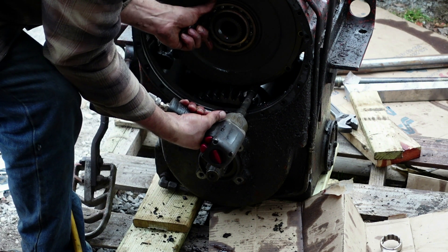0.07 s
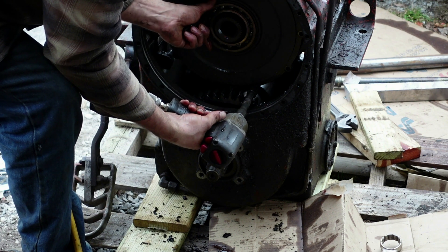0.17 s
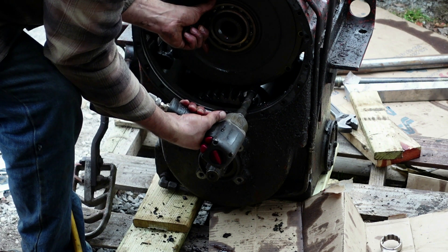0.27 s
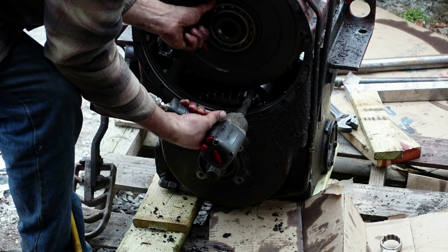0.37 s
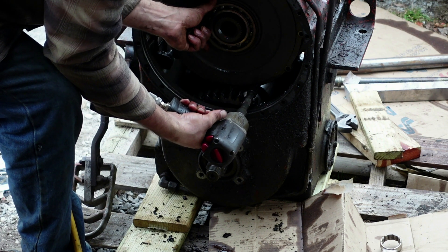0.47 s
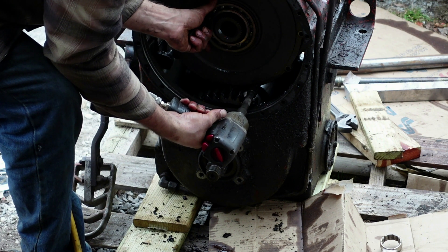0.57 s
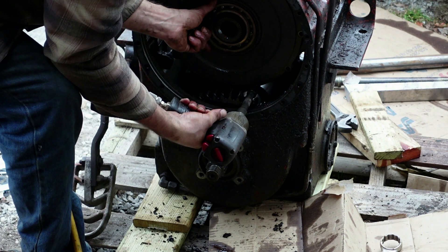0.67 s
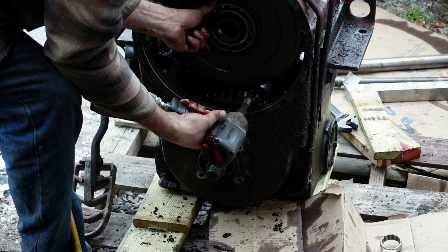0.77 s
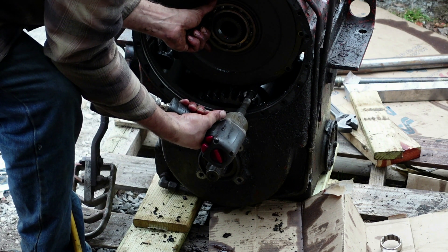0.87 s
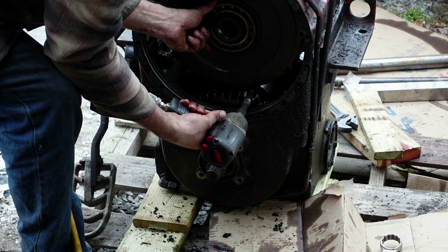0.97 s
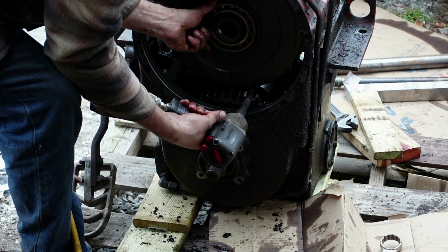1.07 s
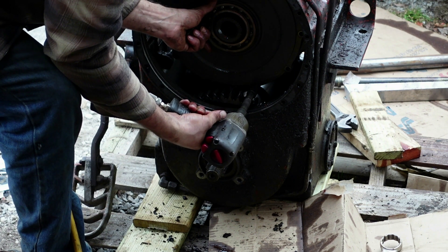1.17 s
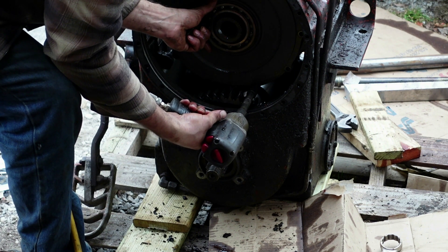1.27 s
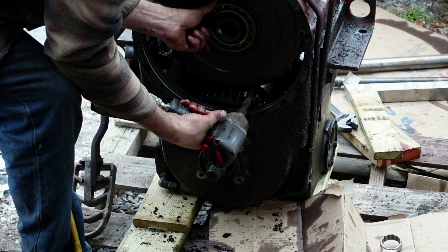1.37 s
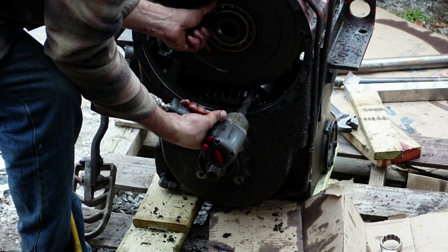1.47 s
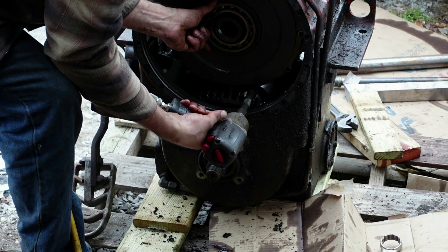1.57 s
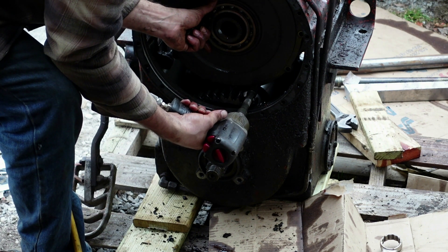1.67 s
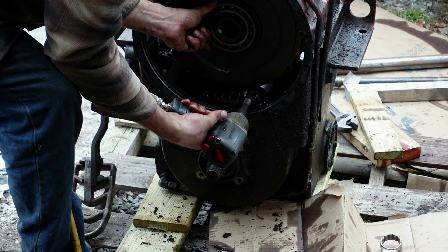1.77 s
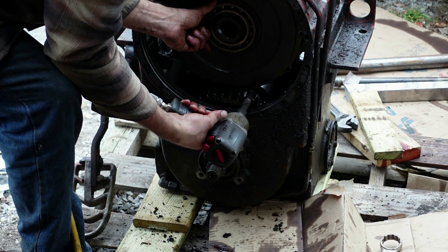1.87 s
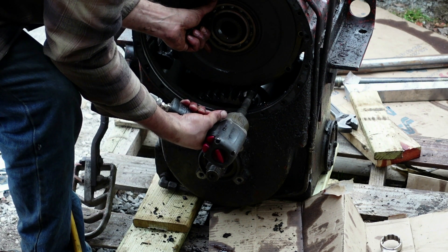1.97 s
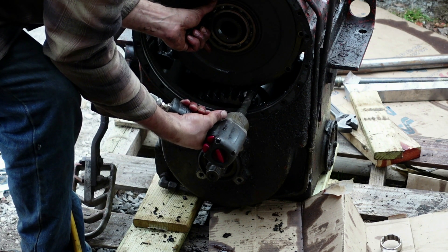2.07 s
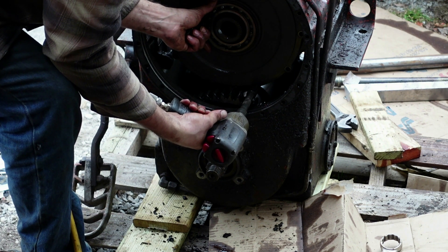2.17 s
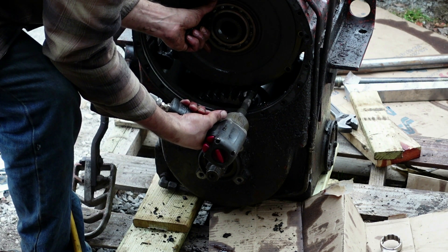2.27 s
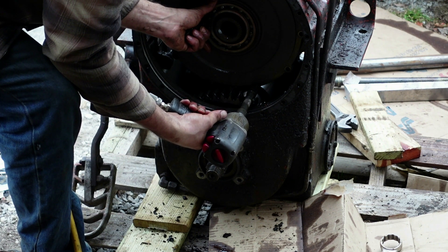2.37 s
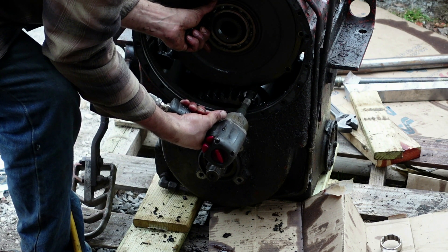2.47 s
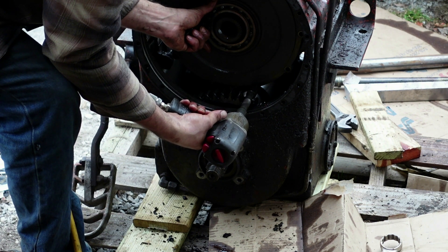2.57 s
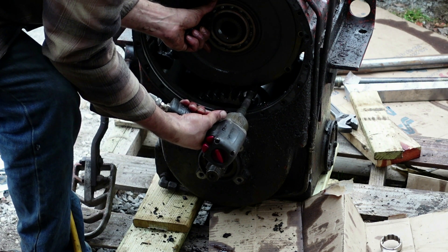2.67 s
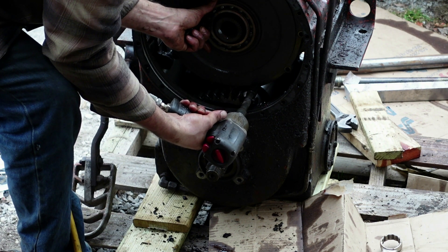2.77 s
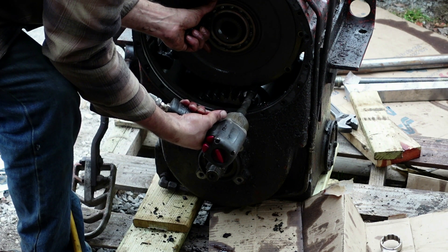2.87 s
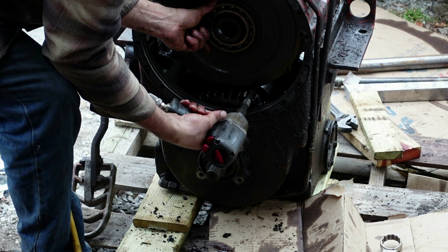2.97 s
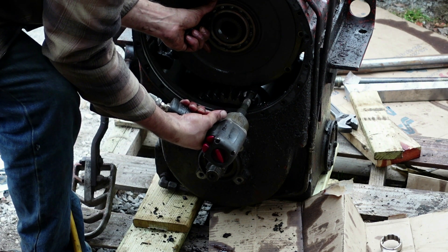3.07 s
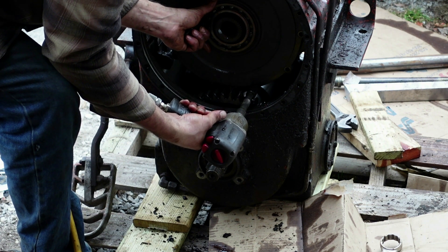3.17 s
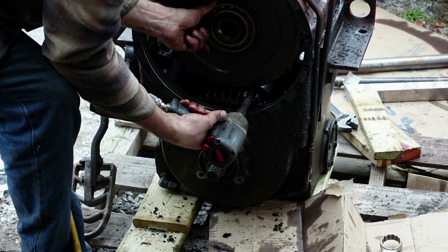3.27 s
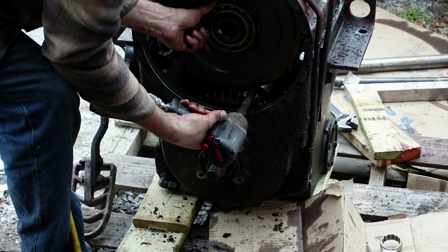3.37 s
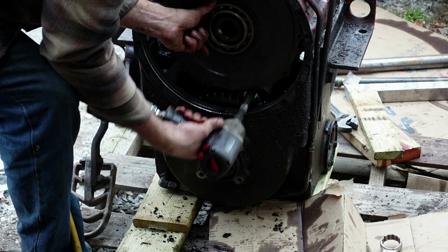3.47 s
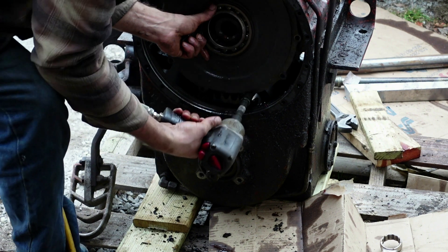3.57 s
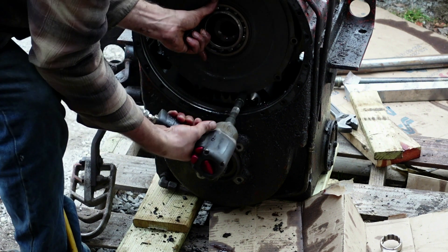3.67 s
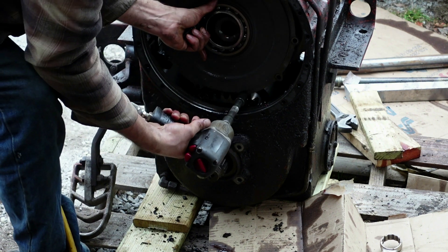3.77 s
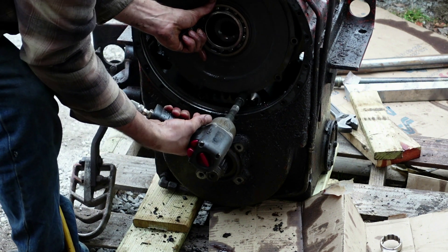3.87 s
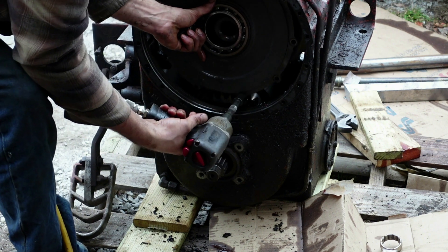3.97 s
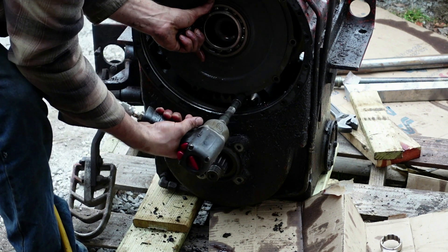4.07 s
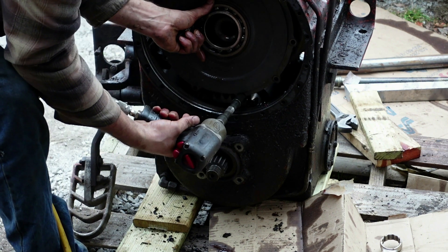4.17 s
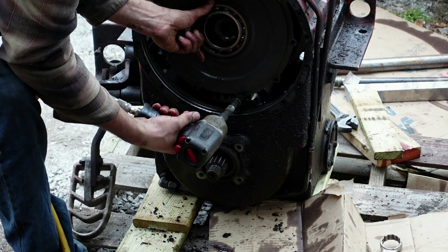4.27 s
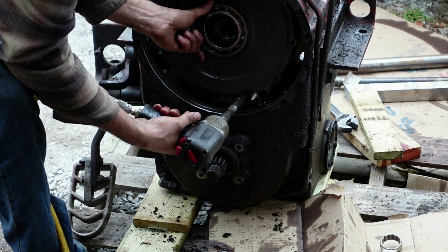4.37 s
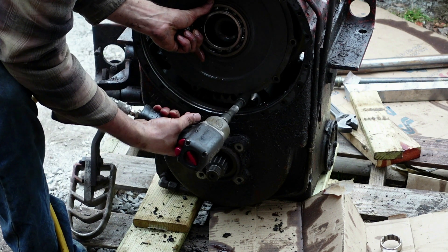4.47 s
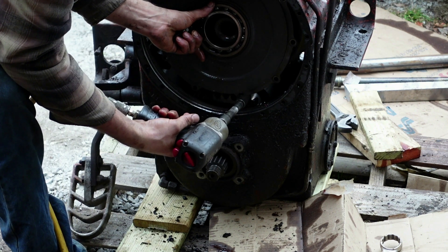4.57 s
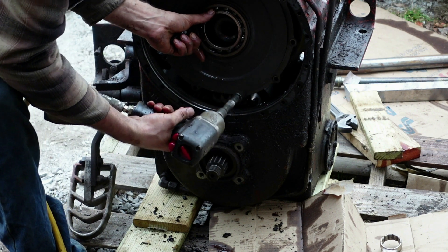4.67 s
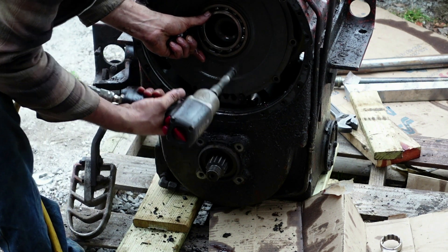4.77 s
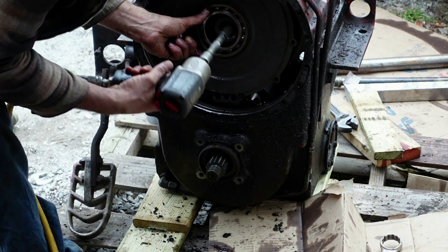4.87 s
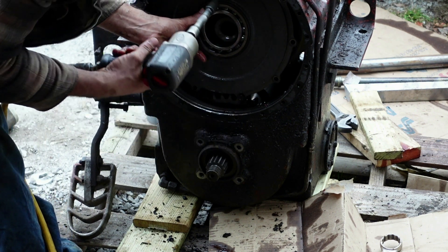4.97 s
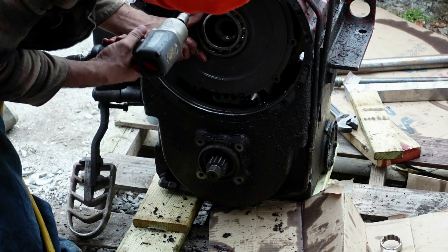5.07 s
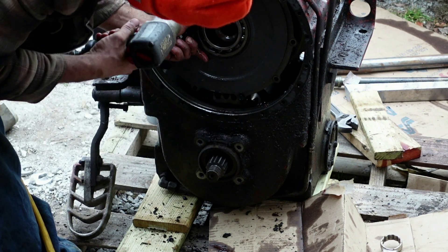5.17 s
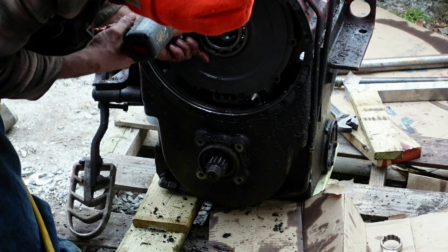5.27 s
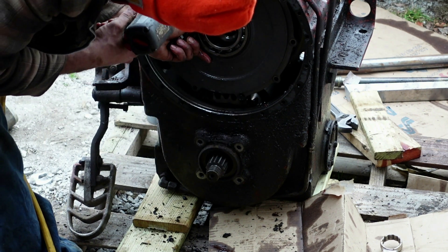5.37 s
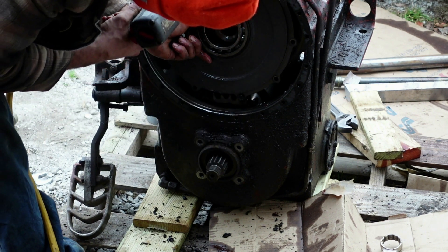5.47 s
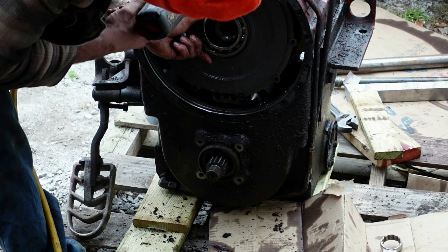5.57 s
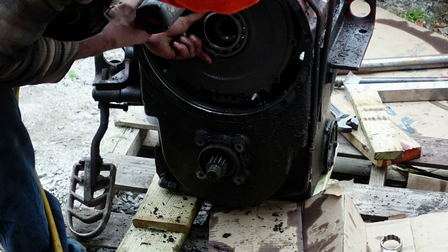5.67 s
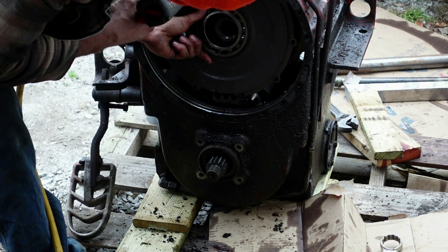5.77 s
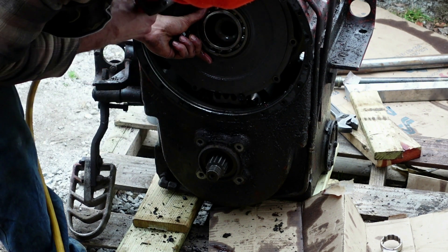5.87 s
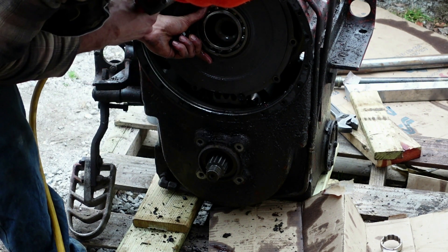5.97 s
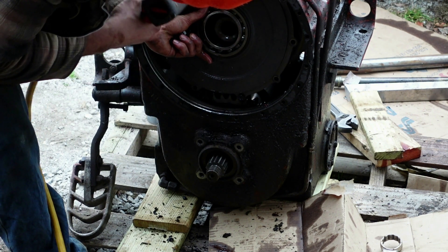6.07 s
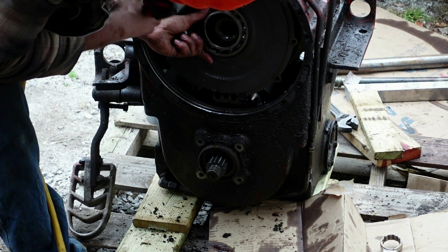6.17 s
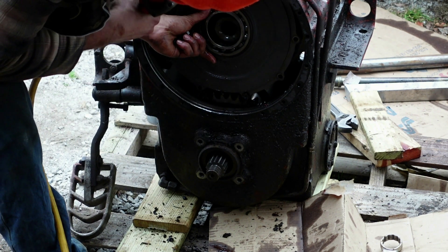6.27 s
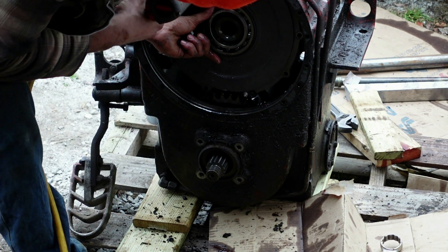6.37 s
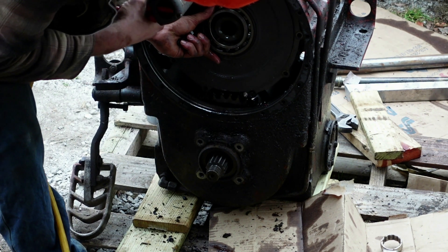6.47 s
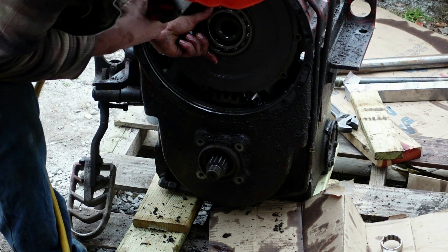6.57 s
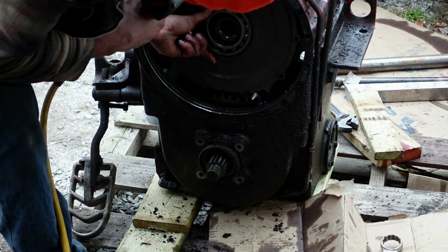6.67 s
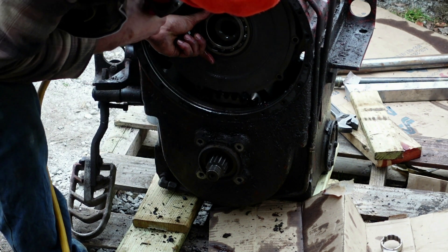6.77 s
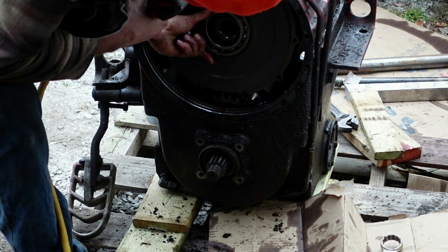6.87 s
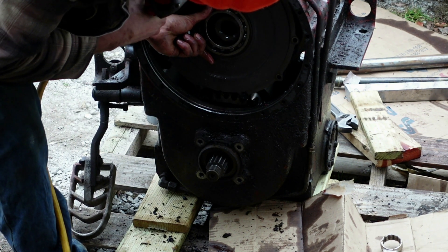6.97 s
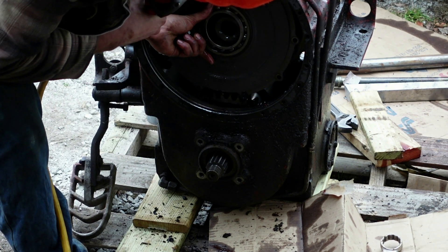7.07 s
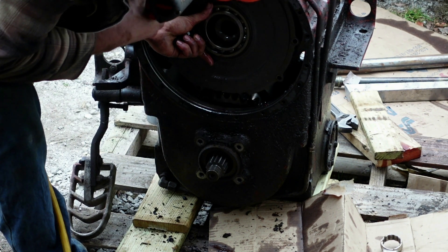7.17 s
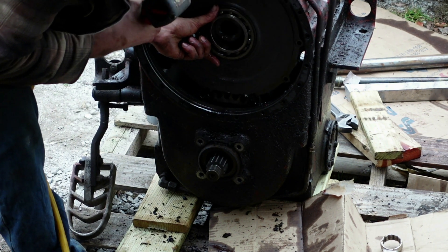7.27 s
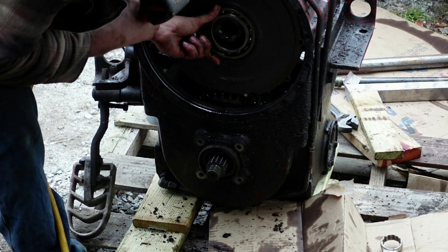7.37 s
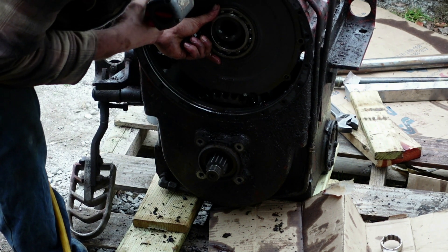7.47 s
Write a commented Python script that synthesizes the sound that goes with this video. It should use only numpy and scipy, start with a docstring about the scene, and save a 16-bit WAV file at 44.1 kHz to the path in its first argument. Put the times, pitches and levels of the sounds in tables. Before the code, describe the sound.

Close, nearly central sound in a workshop with short, bright wall reflections. From 0 to 3.53 s an air impact wrench hammers at nearly six strokes a second, slightly uneven: two light rattling blows, then a hard slam ringing steel and iron, sometimes a softer rebound. Between blows the motor gulps air, barks, buzzes upward and is braked, with pulsing exhaust hiss. At 3.54 s the bolt gives, the rotor surges and slows, exhaust dies from 3.7 s, and a short squeak and dull knock come around 3.8 s. Faint scrapes and singing socket touches last to 4.35 s, then near silence over a quiet steady background. A click at 5.7 s opens soft rustling and irregular clinks, clanks and knocks, strongest at 6.3 and 6.78 s. Air whistles faintly from 6.95 s; at 7.17 s the motor whirls up freely, peaks near 7.3 s and drops in pitch, fading by about 7.55 s.

```python
"""An air impact wrench hammers a bolt out of a heavy iron housing, about six rattling strokes a second.
The bolt comes free, the motor coasts down and squeaks; then socket and housing click and knock
as the tool is set on the next bolt. Air whistles through the half-open trigger and the motor whirls up freely.
Blows are short bursts of noise through ringing metal, and the motor is a buzz with pulsing hiss.
Cloth and hose rustle, a quiet background lies underneath, and hard workshop walls answer."""
import sys
import numpy as np
from scipy import signal
from scipy.fft import rfft, irfft, next_fast_len
from scipy.io import wavfile
from scipy.ndimage import uniform_filter1d, map_coordinates

SR = 44100
rng = np.random.default_rng(int(sys.argv[2]) if len(sys.argv) > 2 else 0)


def inscribe(sig):
    """Save sig as 16-bit PCM at rate SR to the path in sys.argv[1].

    A 1-D sig is mono; a 2-D sig holds one channel per row.
    Samples are clipped to [-1, 1] before scaling.
    """
    pcm = np.round(np.clip(np.atleast_2d(sig).T, -1, 1) * 32767)
    wavfile.write(sys.argv[1], SR, pcm.astype(np.int16))


N = 332514  # length in samples

# Levels in the tables are starting points: each layer may still be trimmed or varied where it is made.

# Hammer strokes, two light blows and a slam. Each row: first blow in seconds, slam in seconds,
# light blows in dB, slam in dB, muffler bark in dB, rotor howl in dB, lean from cover ring to housing boom in dB.
STROKES = [(.001, 0.063, -13, -12.5, -37, -31, -0.5), (.149, 0.2184, -12.5, -14, -30.5, -35, 1.5),
           (0.336, 0.4185, -14, -11, -35.5, -38.5, -4), (0.523, 0.5895, -11.5, -12, -32.5, -34, 0),
           (.705, .7781, -11, -13.5, -17.5, -28.5, -5), (.868, .9348, -11, -13, -35, -28.5, -2),
           (1.039, 1.0974, -12, -14, -40, -27, 0), (1.197, 1.262, -11, -11, -35.5, -32, -1),
           (1.372, 1.4388, -15, -13.5, -29, -31.5, -6.5), (1.535, 1.6054, -10, -11, -26.5, -29.5, 1),
           (1.696, 1.7683, -11, -13, -22.5, -27, 5.5), (1.8785, 1.946, -12, -13.5, -22.5, -29, -4),
           (2.0575, 2.1233, -11.5, -12.5, -33.5, -31, 5.5), (2.2334, 2.2947, -9.5, -13, -28, -31, 0),
           (2.401, 2.4702, -11.5, -12.5, -17, -29.5, 9), (2.594, 2.6553, -10.5, -13, -23.5, -29, 4),
           (2.768, 2.829, -11.5, -12, -28.5, -29, 5.5), (2.945, 3.0046, -12, -13, -29.5, -29.5, 1),
           (3.114, 3.1719, -10.5, -11, -27.5, -27, 10), (3.290, 3.3494, -10, -13, -40.5, -28, 6),
           (3.466, 3.5302, -12.5, -11, -30, -28.5, 4)]
# The hammer rebounds between strokes. Each row: time in seconds, level in dB.
REBOUNDS = [(0.1144, -13), (0.8395, -7.5), (1.0066, -12.5), (1.1608, -11.5), (1.6721, -9.5), (2.0193, -13),
            (2.2004, -12.5), (2.3725, -11.5), (2.7327, -11), (2.9128, -12), (3.0824, -10), (3.25, -13),
            (3.4336, -12.5)]
# Colour of hammer on anvil. Each row: frequency in Hz, relative level in dB per Hz.
CLACK = [(760, -30), (1300, -1), (1370, 0.5), (1470, -1.5), (1600, 0), (2340, -8), (2740, -4), (3600, -7),
         (4830, -7.5), (7920, -7), (9970, -13.5), (14300, -16.5), (16000, -21)]
# Ringing of socket and anvil. Each row: frequency in Hz, width in Hz, relative level in dB.
STEEL = [(1970, 25, -21), (2320, 30, 6), (2636, 26, -4.5), (2850, 48, 6.5), (3546, 20, -17), (4213, 48, 6),
         (4838, 83, -3.5), (6226, 55, 4), (8133, 90, -10.5), (8800, 14, -6.5)]
# Ringing of the housing. Each row: frequency in Hz, width in Hz, relative level in dB.
IRON = [(342, 20, -4.5), (483, 120, -13.5), (570, 28, -7), (1030, 19, -6.5), (1126, 27, 1), (1388, 47, 4),
        (1574, 43, -4.5), (1840, 46, -7)]
# Housing boom under the slam. Each row: frequency in Hz, relative level in dB, time to fall 60 dB in seconds.
BOOM = [(586, -3.5, 0.089), (609.2, -8, 0.15), (535, -4, 0.058)]
# Cover ring under the slam. Each row: frequency in Hz, relative level in dB, time to fall 60 dB in seconds.
RING = [(1151, 4, 0.18), (850, -16, 0.32), (1343, -11, 0.34), (1586, -8.5, 0.19)]

# Course of the rotor through a stroke. Each row: seconds after the kick, vanes passing in Hz, swell in dB.
STROKE = [(0, 328, -13.5), (.02, 540, -3), (0.039, 562.6, -1.5), (.06, 479.5, 1.5), (.075, 417.7, 0),
          (0.091, 338.4, -11.5), (.13, 288.7, -17.5), (.2, 249, -17.5)]
# Colour of the gulp of air. Each row: frequency in Hz, relative level in dB per Hz.
THUMP = [(30, -38.5), (60, -23), (100, -10.5), (150, 0.5), (320, 1), (500, -5.5), (1000, -31.5),
         (3000, -72)]
# Bark of the muffler. Each row: frequency in Hz, relative level in dB, time to fall 60 dB in seconds.
BARK = [(1042, 6, 0.029), (940, -6, 0.063), (1346, -16, 0.23)]
# Colour of the muffler's howl under load. Each row: frequency in Hz, relative level in dB per Hz.
HOWL = [(200, -32.5), (480, -8.5), (720, -6), (900, 4.5), (1050, 3), (1250, -5), (2000, -17), (4000, -36),
        (12000, -40.5)]
# Colour of the air in the motor. Each row: frequency in Hz, relative level in dB per Hz.
CHURN = [(40, -47), (100, -23.5), (220, -3), (350, -0.5), (560, 1), (760, -6), (1100, -2), (2000, -16),
         (5000, -38.5)]
# Colour of the exhaust air under load. Each row: frequency in Hz, relative level in dB per Hz.
EXHAUST = [(71, -59.5), (120, -29), (295, -2.5), (385, -8.5), (524, -1.5), (670, -3.5), (1370, -1),
           (1550, 0), (2750, -3), (3820, -4.5), (10200, -10.5), (13600, -17), (16000, -18)]

# Squeak as the rotor stops. Each row: frequency in Hz, relative level in dB, time to fall 60 dB in seconds.
SQUEAK = [(760, 1.5, .08), (930, -9, .07)]
# Speed of the free run. Each row: time in seconds, vanes passing in Hz.
SPIN = [(7.11, 264.2), (7.159, 245.1), (7.235, 353.9), (7.265, 478.3), (7.293, 541.9), (7.35, 439),
        (7.41, 350.3), (7.465, 289), (7.54, 236.6)]
# Colour of the motor case's hum. Each row: frequency in Hz, relative level in dB per Hz.
HUM = [(50, -36), (150, -12.5), (260, -1.5), (350, 2), (500, -2), (750, -5.5), (1200, -15), (3000, -44.5)]
# Resonances of the muffler. Each row: frequency in Hz, width in Hz, relative level in dB.
MUFFLER = [(900, 77, -4), (1054, 130, 5.5), (1166, 64, 2.5), (1390, 33, -3), (1580, 100, -19)]
# Colour of the air in the free run. Each row: frequency in Hz, relative level in dB per Hz.
BLAST = [(100, -50.5), (760, -33.5), (1300, -10.5), (1380, -5.5), (2110, -5), (2290, -9.5), (2830, -4.5),
         (3720, -10.5), (4540, -6.5), (5480, -9.5), (12700, -15.5), (16000, -21)]

# Air leaks through the trigger valve. Each row: start in seconds, end in seconds, rise in seconds, level in dB.
LEAKS = [(6.948, 7.16, 0.11, -38), (7.155, 7.2, .02, -26)]
# Tones of the trigger valve. Each row: frequency in Hz, width in Hz, relative level in dB.
VALVE = [(1056, 110, 5), (2766, 180, -4), (3550, 300, -14), (6100, 330, 3.5), (6800, 200, -9),
         (8600, 300, -9.5), (9300, 250, 2.5), (9800, 300, -5.5), (11290, 150, 0.5), (15600, 500, -7.5)]
# The rotor runs light and the slots hiss. Each row: start in seconds, end in seconds, level in dB.
RACES = [(.215, .43, -32.5), (3.535, 3.62, -25)]
# Tones of the exhaust slots. Each row: frequency in Hz, width in Hz, relative level in dB.
PORTS = [(7700, 300, 1), (8850, 450, -3), (9700, 400, -1), (10760, 250, -3.5), (13000, 340, -6)]

# Socket and tool meet the iron, sharply or sliding. Each row: time in seconds, click in dB,
# clank in dB against the click, thud in dB against the click, rise in seconds.
CONTACTS = [(3.758, -28, 1.5, 3.5, .01), (3.824, -37, -4.5, 0, .0008), (4.0098, -52.5, 2.5, -3, .0008),
            (4.036, -45.5, 1.5, -3, .01), (4.06, -43.5, 1, -4.5, .01), (4.114, -45, 2, -3, .01),
            (4.3142, -61.5, 6, -10, .0008), (4.3423, -64.5, 10.5, 1, 0.00077),
            (5.7131, -27, -7, -19, .0008), (5.876, -52.5, 6, 21, .01), (5.938, -36.5, 3, 3, .01),
            (5.956, -37, -2, 7, .01), (6.1015, -38.5, -18, -11.5, .0008), (6.12, -49.5, 4.5, 7.5, .01),
            (6.192, -43.5, -4.5, 0.5, .01), (6.2477, -35.5, -4.5, -2.5, .0008),
            (6.2806, -30.5, 11.5, 7, .002), (6.29, -34, 11, 12.5, .01), (6.3577, -24.5, -7.5, -4.5, .0008),
            (6.418, -31, -7.5, -19, .0008), (6.4742, -41, 6, 5.5, .0008), (6.4865, -33, -5, -6.5, .0008),
            (6.5285, -37, -5, -15, .0008), (6.6573, -47, 2, -11, .0008), (6.736, -49, 5.5, -7, .0008),
            (6.756, -32.5, -1.5, -9.5, .01), (6.7832, -17.5, -4.5, -6, .0015)]
# Colour of a hard contact. Each row: frequency in Hz, relative level in dB per Hz.
CLICK = [(1500, -21), (3000, -1), (4800, 2.5), (6300, -1.5), (8200, -2), (9500, -7), (12000, -12.5),
         (16000, -23)]
# Colour of the tool body. Each row: frequency in Hz, relative level in dB per Hz.
CLANK = [(100, -47), (700, -23.5), (1300, -3.5), (1750, 4.5), (2300, -8), (2850, -3), (3600, -6),
         (5500, -18.5), (12000, -42)]
# Colour of a dull contact. Each row: frequency in Hz, relative level in dB per Hz.
KNOCK = [(30, -67), (70, -46.5), (130, -27.5), (350, -6), (600, -3), (900, 1), (1250, -0.5), (1700, -10),
         (3000, -36.5)]
# Ringing of the wrench case. Each row: frequency in Hz, width in Hz, relative level in dB.
CASE = [(920, 45, 4), (1125, 50, -3.5), (1530, 78, -4), (1780, 44, 4.5), (2450, 62, -13), (2900, 140, 0.5),
        (3530, 82, -8.5)]
# The loose socket sings when brushed. Each row: time in seconds, level in dB, frequency in Hz.
SINGS = [(4.04, -53, 4750), (4.066, -45.5, 4838), (4.112, -50, 8850), (6.488, -46, 8133),
         (6.529, -53, 8900)]
# Sleeves and hose move. Each row: start in seconds, end in seconds, level in dB.
RUSTLES = [(3.75, 4.1, -57.5), (5.677, 7.0, -58.5), (6.199, 6.42, -51)]
# Colour of the rustling. Each row: frequency in Hz, relative level in dB per Hz.
CLOTH = [(30, -48), (100, -30), (160, -14), (400, 4.5), (1000, 1), (1700, 3.5), (2500, -6), (4500, -13),
         (9000, -16.5), (16000, -22)]

# Colour of the background. Each row: frequency in Hz, relative level in dB per Hz.
AMBIENCE = [(18, -68.5), (30, -38.5), (75, -16), (215, -17.5), (303, -7), (374, -19), (404, -7), (632, -11),
            (780, -3.5), (889, -12), (1250, -6.5), (2290, -18), (16000, -30.5)]
# How long the walls ring on. Each row: frequency in Hz, time to fall 60 dB in seconds.
WALLS = [(150, 0.22), (1000, 0.3), (5000, 0.38), (15000, 0.26)]
# Stereo width of the reflections. Each row: frequency in Hz, gain of the side signal in dB.
WIDTH = [(40, -15.5), (130, -26.5), (400, -20.5), (1000, -9.5), (2500, -5), (12000, -4)]

SECOND_BLOW_SHARE, SECOND_BLOW_DB = .275, 0.06  # how far on from first blow to slam; level against the first
FIRST_RISE_S, SECOND_RISE_S = .002, .001  # the first blow of a stroke bites more slowly
REBOUND_RISE_S = .002  # rebounds are softer than the slam
BODY_DB = -15.5  # push of a blow on the housing, against the blow's listed level
SNAP_DB = -3  # instant of steel meeting steel, against the listed slam
BOOM_DB, RING_DB = -16, -27.5  # housing and cover under the slam, before the lean
RING_SPREAD = .022  # typical random share by which each struck mode is detuned
KICK_LEAD_S = .004  # the gulp of air comes before the first blow
THUMP_DB, THUMP_PER_BARK = -29, .4  # average gulp, and how much it grows with the bark (dB per dB)
HISS_DB, LOAD_WHISTLE_DB = -32.5, -39  # exhaust and valve while hammering, before the swell
CHURN_DB = -3.5  # air in the motor, against the listed howl
FREE_S, RELEASE_S = 3.54, 3.71  # the bolt comes free; the trigger is let go
COAST_HZ, COAST_SLOWING_S = 342.7, .6  # vane rate as the bolt comes free, and its time constant
SURGE_DB, COAST_DB, COAST_AIR_DB = -23.5, -32.5, -24  # rotor as the bolt gives, rotor coasting, its exhaust
STOP_S, STOP_DB = 3.795, -29  # the rotor squeaks to a stop
CREEP_S, PULL_S, EASE_S = 7.112, 7.168, 7.43  # the rotor creeps, the trigger is pulled, then eased
CREEP_DB, GULP_DB, RUN_DB = -42, -29, -28  # hum layers of the free run
MUFFLER_DB, HOWL_DB_PER_OCTAVE = -17.5, 2.5  # howl at top speed, and its growth with speed
BLAST_DB = -24.5  # air of the free run at the start, before it sags
WHISTLE_DB = -7.5  # the leak's clearest tone, against the other valve tones
CONTACT_T60_S, T60_PER_RISE = .04, 1.9  # a sliding contact lasts longer
SING_WIDTH_HZ = 200  # the brushed socket's tone is rough
TOP_HZ = 15800  # nothing sounds above this


def hammer():
    """Light blows rattle the socket; the slam cracks and rings housing and cover; the hammer rebounds."""
    first, slam, light_db, slam_db, _, _, lean_db = np.transpose(STROKES)
    rebound, rebound_db = np.transpose(REBOUNDS)
    second = first + SECOND_BLOW_SHARE * (slam - first)
    light = np.r_[first, second]
    db = np.r_[light_db, light_db + SECOND_BLOW_DB]
    rise = np.repeat([FIRST_RISE_S, SECOND_RISE_S], len(first))

    rattle = bursts(light, db - 2, t60=0.057, attack=rise, grain_db=1.5)
    bounce = bursts(rebound, rebound_db - 1.5, t60=0.05, attack=REBOUND_RISE_S, grain_db=0.5)
    snap = bursts(slam, slam_db + SNAP_DB, t60=.025, attack=0.00028, grain_db=1)
    smash = bursts(slam, slam_db - 1.1, t60=0.09, attack=0.0006, grain_db=1.2)
    crack = rattle + bounce + snap + smash
    push_db = np.r_[db, rebound_db] + BODY_DB
    push = bursts(np.r_[light, rebound], push_db, t60=0.046, attack=.001, grain_db=1)

    clack = amp(-2.5) * coloured(crack, CLACK)
    steel = patchy(clack + amp(-9.5) * ringing(crack, STEEL), depth_db=2.5)
    body = amp(-1) * ringing(push, IRON) + amp(-11) * coloured(crack, KNOCK)
    boom = pings(slam, BOOM_DB + lean_db, BOOM, attack=0.0095)
    ring = pings(slam, RING_DB - lean_db, RING, attack=0.0022)
    return steel + body + boom + ring


def stroking_motor():
    """Each stroke: a gulp of air thumps and barks in the muffler, the rotor howls up and is braked again."""
    first, _, _, _, bark_db, howl_db, _ = np.transpose(STROKES)
    kick_s = np.maximum(first - KICK_LEAD_S, 0)
    thump_db = THUMP_DB + THUMP_PER_BARK * (bark_db - bark_db.mean())
    thump = coloured(bursts(kick_s, thump_db, t60=.11, attack=0.003, grain_db=3.5), THUMP)
    bark = pings(first, bark_db + 9, BARK, attack=0.0026)

    t = np.arange(N) / SR
    stroke = np.maximum(np.searchsorted(kick_s, t, side="right") - 1, 0)  # which stroke we are in
    age = t - kick_s[stroke]
    after, vane_hz, swell_db = np.transpose(STROKE)
    swell = np.interp(age, after, swell_db)
    pitch_hz = np.interp(age, after, vane_hz) * (1 + .035 * wobble(10))
    buzz, puffs = vanes(pitch_hz, jitter=0.02, rough=0.97, slope=0.36)
    howl = amp(howl_db[stroke] + swell - 2.5) * unit(coloured(buzz, HOWL))

    # the air flow swells and sags with the rotor
    churn_db = howl_db[stroke] + CHURN_DB + .45 * swell + 1.6 * wobble(50)
    churn = amp(churn_db) * coloured(noise(), CHURN)
    hiss = amp(HISS_DB + 0.04 * swell + 2.1 * wobble(90)) * coloured(puffs, EXHAUST)
    whistle = amp(LOAD_WHISTLE_DB + 0.34 * swell) * ringing(noise(), VALVE)
    running = envelope(0, FREE_S, rise_s=.001, fall_db_per_s=600)
    return thump + bark + (howl + churn + hiss + whistle) * running


def coasting_motor():
    """The bolt comes free: the rotor surges, slows and squeaks; the exhaust dies as the trigger is let go."""
    age = np.maximum(np.arange(N) / SR - FREE_S, 0)
    hum, howl, _, puffs = free_rotor(COAST_HZ * np.exp(-age / COAST_SLOWING_S))
    surge = amp(SURGE_DB) * envelope(FREE_S, FREE_S + .012, rise_s=.004, fall_db_per_s=351.5)
    spin = amp(COAST_DB) * envelope(FREE_S, FREE_S, rise_s=.004, fall_db_per_s=70.5)
    rotor = (surge + spin) * (amp(-5.5) * hum + amp(-11) * howl)
    flow = envelope(FREE_S, RELEASE_S, rise_s=.003, fall_db_per_s=176, sag_db_per_s=54.5)
    air = amp(COAST_AIR_DB) * flow * coloured(puffs, EXHAUST)
    return rotor + air + pings([STOP_S], [STOP_DB], SQUEAK, attack=0.0028)


def whirling_motor():
    """The rotor creeps, takes a gulp of air and whirls up; faster turning makes the muffler howl louder."""
    pitch_hz = np.interp(np.arange(N) / SR, *np.transpose(SPIN))
    hum, howl, buzz, puffs = free_rotor(pitch_hz)
    octaves = np.log2(pitch_hz / pitch_hz.max())
    creep = amp(CREEP_DB) * envelope(CREEP_S, CREEP_S + .025, rise_s=0.01803, fall_db_per_s=600)
    gulp = amp(GULP_DB) * envelope(PULL_S, PULL_S + .025, rise_s=.018, fall_db_per_s=300)
    run = amp(RUN_DB) * envelope(PULL_S, EASE_S, rise_s=.02, fall_db_per_s=106.5)
    muffler_db = MUFFLER_DB + HOWL_DB_PER_OCTAVE * octaves
    muffler = amp(muffler_db) * envelope(PULL_S, EASE_S, rise_s=0.12, fall_db_per_s=54.5)
    flow = envelope(PULL_S, EASE_S, rise_s=.018, fall_db_per_s=77, sag_db_per_s=11)
    air = amp(BLAST_DB) * flow * amp(2 * wobble(90)) * coloured(puffs + 0.2 * buzz, BLAST)
    return (creep + gulp + run) * hum + muffler * howl + air


def free_rotor(pitch_hz):
    """The unloaded rotor hums in its case and its harmonics sound the muffler: hum, howl, buzz, puffs."""
    buzz, puffs = vanes(pitch_hz, jitter=.015, rough=1.5, slope=.4)
    hum = steadied(coloured(buzz + 3 * noise(), HUM))
    howl = steadied(ringing(buzz, MUFFLER))
    return hum, howl, buzz, puffs


def vanes(pitch_hz, jitter, rough, slope, count=12):
    """One puff of air per passing vane: a harmonic buzz and hiss gated at the same pace."""
    phase = 2 * np.pi * np.cumsum(pitch_hz * (1 + jitter * wobble(120))) / SR
    buzz = sum(np.cos(k * phase) / k ** slope for k in range(1, count + 1))
    puffs = unit(noise() * (1 + 1.4 * np.cos(phase)))
    return unit(buzz) + rough * puffs, puffs


def valve():
    """Air whistles in the barely open trigger valve, and in the exhaust slots when the rotor runs light."""
    leak = sum(amp(db) * envelope(start, end, rise, fall_db_per_s=900.5) for start, end, rise, db in LEAKS)
    race = sum(amp(db) * envelope(start, end, rise_s=.025, fall_db_per_s=209.5) for start, end, db in RACES)
    clear_tone = ringing(noise(), [(1070, 40, 0)])  # frequency in Hz, width in Hz, level in dB
    whistle = ringing(noise(), VALVE) + amp(WHISTLE_DB) * clear_tone
    slots = amp(-2 + wobble(60)) * ringing(noise(), PORTS)
    return leak * amp(wobble(40)) * whistle + race * slots


def handling():
    """The tool is drawn off and set on the next bolt, the socket singing, sleeves and hose rustling."""
    moves = [amp(db) * envelope(start, end, rise_s=.16, fall_db_per_s=28.5) for start, end, db in RUSTLES]
    moving = np.sqrt(sum(move ** 2 for move in moves))
    rustle = moving * amp(-2.5 + 1.1 * wobble(6)) * coloured(noise(), CLOTH)
    sing = np.zeros(N)
    for s, db, hz in SINGS:
        brush = bursts([s], [db], t60=.11, attack=.005, grain_db=1.5)
        sing += ringing(brush, [(hz, SING_WIDTH_HZ, 0)])
    return contacts() + sing + rustle


def contacts():
    """Steel on iron: a bright click, a clank that rings the wrench case and a duller thud."""
    s, db, clank_db, thud_db, rise = np.transpose(CONTACTS)
    t60 = CONTACT_T60_S + T60_PER_RISE * rise
    click = patchy(bursts(s, db, t60, rise, grain_db=2), depth_db=2.5)
    clank = bursts(s, db + clank_db, 1.77 * t60, rise, grain_db=1.5)
    thud = bursts(s, db + thud_db, 1.8 * t60, 1.4 * rise, grain_db=1.5)
    case = amp(-5) * ringing(clank, CASE)
    return coloured(click, CLICK) + coloured(clank, CLANK) + coloured(thud, KNOCK) + case


def background():
    """A quiet steady noise whose level drifts a little."""
    return amp(-67 + .6 * wobble(5)) * coloured(noise(), AMBIENCE)


def workshop(x, wet_db, side_db):
    """Direct sound plus diffuse reflections, which are wide only in the treble."""
    mid, side = amp(wet_db) * reflections(x)
    near = rng.standard_normal(SR // 100) * np.linspace(1, 0, SR // 100)  # floor and housing, close by
    close = signal.oaconvolve(x, near / np.linalg.norm(near))[:N]
    side = filtered(side + amp(side_db) * close, lambda hz: amp(along(WIDTH, hz)))
    return np.array([x + mid + side, x + mid - side])


def reflections(x, count=4):
    """Wall echoes (mid, side): fading noise in random patterns taken in turn, so their colour keeps varying."""
    hz, t, z = signal.stft(rng.standard_normal((count, 2, SR // 2)), SR, nperseg=256)
    fade = amp(-60 * t / along(WALLS, hz)[:, None]) * (1 - np.exp(-t / 0.0036))
    tails = signal.istft(z * fade, SR, nperseg=256)[1]
    turn = np.arange(N) // (SR // 6) % count  # the next pattern every sixth of a second
    echoes = np.zeros((2, N))
    for k, tail in enumerate(tails):
        part = (x * (turn == k))[None]
        echoes += signal.oaconvolve(part, tail / np.linalg.norm(tail[0]), axes=1)[:, :N]
    return echoes


def bursts(times, levels_db, t60, attack, grain_db):
    """Each contact is a short dying chatter of tiny collisions."""
    power, t = np.zeros(N + SR), np.arange(SR // 4) / SR
    for s, db, life, rise in np.broadcast(times, levels_db, t60, attack):
        shape = amp(db - 60 * t / life) * (1 - np.exp(-t / rise))
        power[max(round(s * SR), 0):][:len(t)] += shape ** 2
    return np.sqrt(power[:N]) * unit(noise() * amp(grain_db * wobble(1500)))


def pings(times, levels_db, modes, attack):
    """Each event rings the modes with slightly new strengths and tuning."""
    out, t = np.zeros(N + SR), np.arange(SR // 3) / SR
    hz, mode_db, t60 = np.transpose(modes)[:, :, None]
    for s, db in zip(times, levels_db):
        size, detune, phase = rng.standard_normal((3, len(modes), 1))
        tone = np.sin(2 * np.pi * (hz * (1 + RING_SPREAD * detune) * t + phase))
        ring = amp(db + mode_db + size - 60 * t / t60) * tone
        out[round(s * SR):][:len(t)] += ring.sum(0) * (1 - np.exp(-(t / attack) ** 2))
    return out[:N]


def ringing(x, modes):
    """x through damped resonances of unit total energy; wider ones die sooner."""
    t = np.arange(SR // 4) / SR
    ir = np.zeros(len(t))
    for k, (hz, width, db) in enumerate(modes):
        decay = width * np.exp(-np.pi * width * t)
        ir += (-1) ** k * amp(db) * decay * np.cos(2 * np.pi * hz * t)
    return signal.oaconvolve(x, ir / np.linalg.norm(ir))[:N]


def coloured(x, spectrum, size=4096):
    """Filter of unit energy with the given spectrum, which never sounds ahead of its input."""
    cep = irfft(np.log(amp(along(spectrum, np.fft.rfftfreq(size, 1 / SR))) + 1e-6))
    # folding the cepstrum forward packs the energy as early as possible
    cep[1:size // 2] *= 2
    cep[size // 2 + 1:] = 0
    ir = irfft(np.exp(rfft(cep)))
    return signal.oaconvolve(x, ir / np.linalg.norm(ir))[:N]


def patchy(x, depth_db):
    """Random gain patches over time and pitch, so the colour of blows and clicks keeps shifting."""
    z = signal.stft(x, nperseg=256)[2]
    across_pitch = uniform_filter1d(rng.standard_normal(z.shape), size=5, axis=0)
    field = uniform_filter1d(across_pitch, size=14, axis=1)
    return signal.istft(z * amp(depth_db * unit(field)), nperseg=256)[1][:N]


def envelope(start, end, rise_s, fall_db_per_s, sag_db_per_s=0):
    """Gain that rises from start, holds or sags until end, then dies away."""
    t = np.arange(N) / SR
    sag_db = sag_db_per_s * np.clip(t - start, 0, end - start)
    fall_db = fall_db_per_s * np.maximum(t - end, 0)
    return np.clip((t - start) / rise_s, 0, 1) * amp(-sag_db - fall_db)


def steadied(x):
    """Even out the loudness over 3000 samples."""
    return x / np.sqrt(np.abs(uniform_filter1d(x ** 2, size=3000)) + 1e-9)


def filtered(x, response):
    """x times a response given as a function of frequency."""
    m = next_fast_len(N + SR // 2)
    return irfft(rfft(x, m) * response(np.fft.rfftfreq(m, 1 / SR)), m)[..., :N]


def along(points, hz):
    """Read a curve of (Hz, value) points on a log frequency axis."""
    f, v = np.transpose(points)
    return np.interp(np.log(hz + 1), np.log(f + 1), v)


def wobble(rate):
    """A smooth random curve, rate knots a second."""
    knots = rng.standard_normal(int(N * rate / SR) + 4)
    return map_coordinates(knots, [np.arange(N) * rate / SR])


def noise():
    """Fresh white noise."""
    return rng.standard_normal(N)


def unit(x):
    """Scale to rms 1."""
    return x / np.sqrt(np.mean(x ** 2) + 1e-20)


def amp(db):
    """Decibels to gain."""
    return 10 ** (np.asarray(db) / 20)


def scene():
    """The running wrench, its handling and the quiet background in the workshop."""
    wrench = hammer() + stroking_motor() + coasting_motor() + whirling_motor() + valve()
    tool = workshop(wrench, wet_db=-7.0, side_db=-16.0)
    rest = workshop(handling() + background(), wet_db=-8.0, side_db=-2.0)
    return (tool + rest) * amp([[-.15], [.15]])  # the second channel is slightly louder


def record(dry):
    """Cut off everything from the band limit upwards."""
    return filtered(dry, lambda hz: hz < TOP_HZ)


dry = scene()
out = record(dry)
inscribe(out)
```